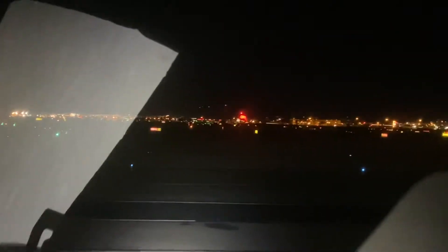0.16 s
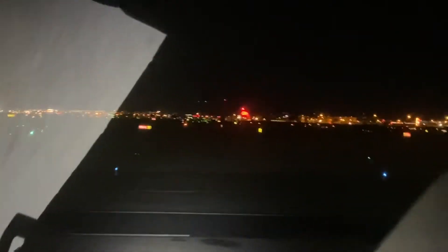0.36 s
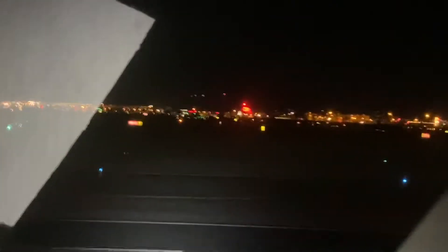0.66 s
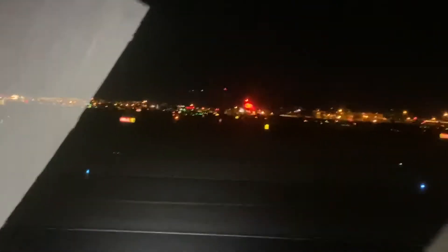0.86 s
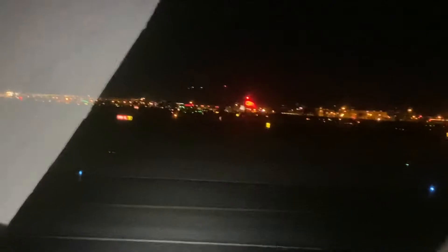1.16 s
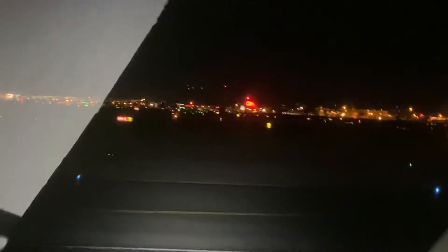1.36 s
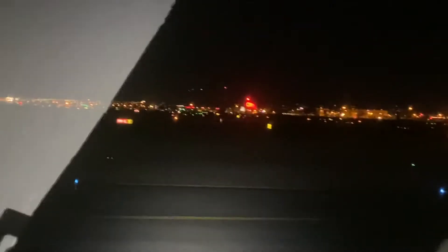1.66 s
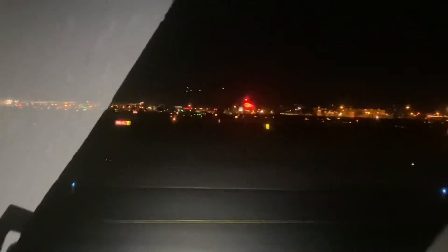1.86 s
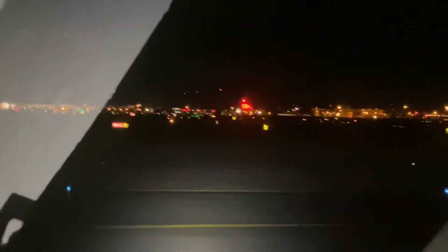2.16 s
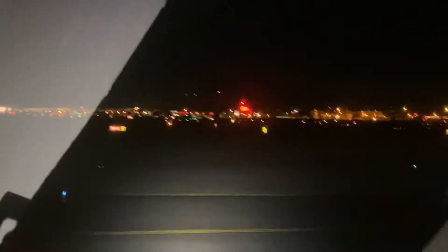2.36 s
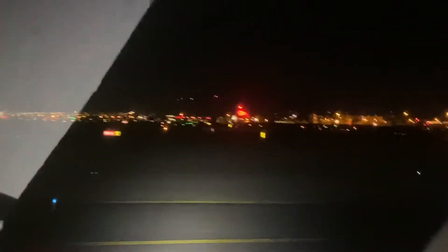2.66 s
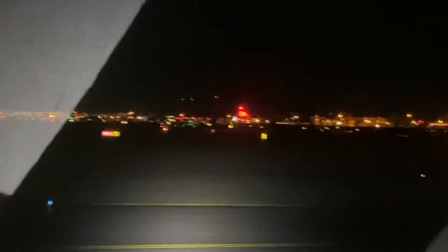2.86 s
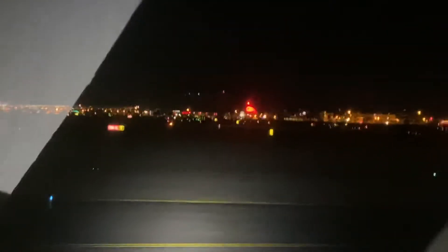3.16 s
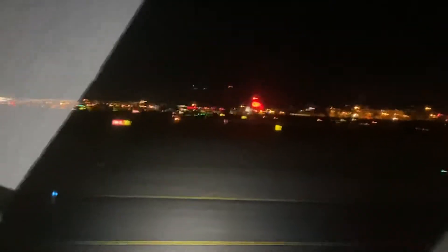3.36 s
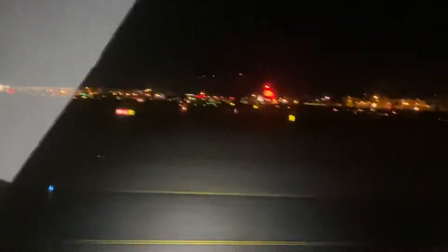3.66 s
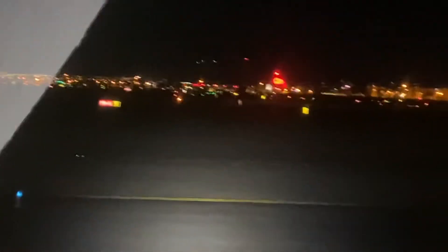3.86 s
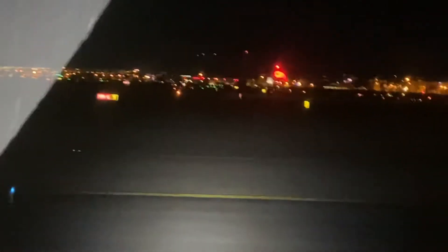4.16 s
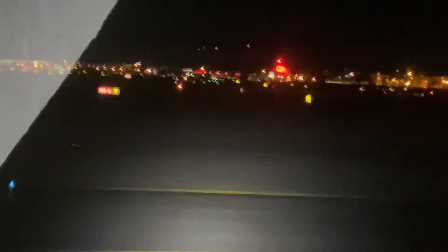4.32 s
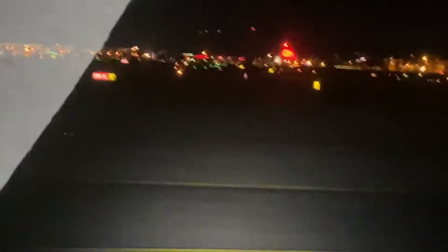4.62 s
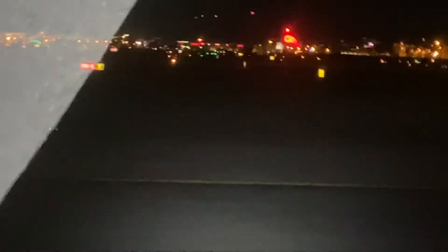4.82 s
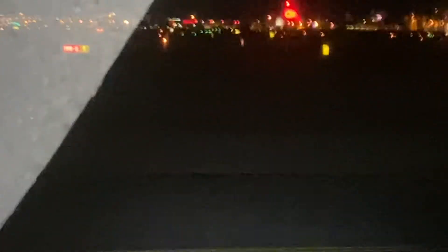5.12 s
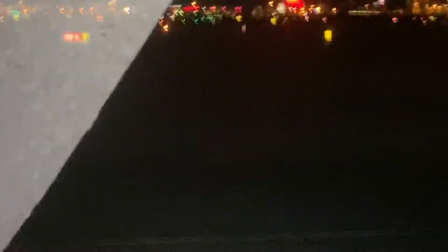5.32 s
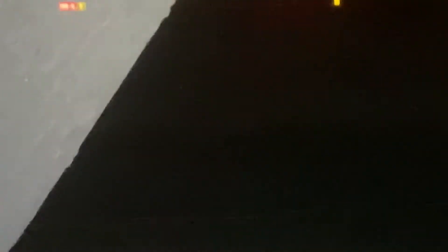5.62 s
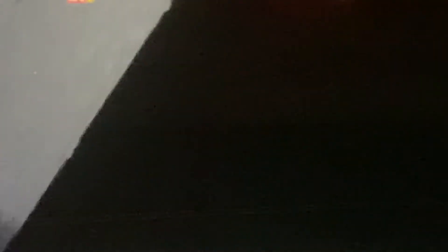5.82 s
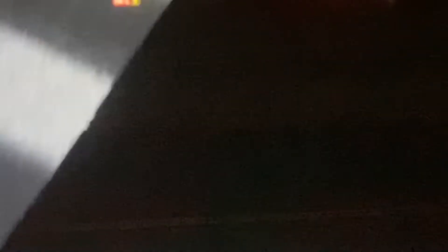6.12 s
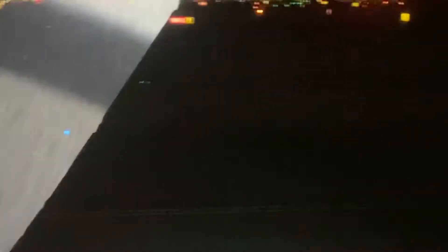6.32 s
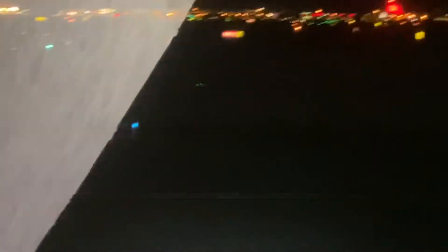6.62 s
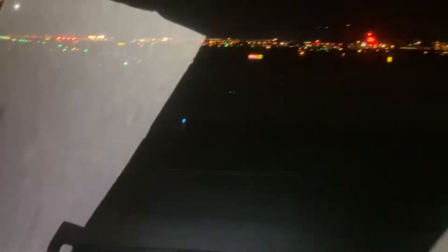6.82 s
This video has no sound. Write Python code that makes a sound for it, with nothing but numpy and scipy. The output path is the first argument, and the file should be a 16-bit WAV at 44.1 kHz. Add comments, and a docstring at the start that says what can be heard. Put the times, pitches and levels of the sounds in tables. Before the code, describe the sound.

A continuous helicopter ride noise heard from within the cabin. Bassy boom and rough midrange chop dominate, fluttering with every blade pass and shifting slightly in strength. Some passes slap harder, early on and again in scattered moments later. Wavering drivetrain hums, a thin steady whine and patchy engine hiss continue throughout, with tiny rattling ticks. The closely spaced microphone pair hears it all inside, without any start-up or shutdown.

```python
"""Inside a helicopter cabin at steady power, heard by two microphone ports a few centimetres apart.
Blade passes throb about twenty times a second: noise that partly repeats from pass to pass, with damped slaps.
Blade hums, a drive shaft and gear teeth are wavering sines, nearly all locked to the rotor angle.
The turbine is patchy hiss with blurred compressor whines, and loose trim ticks as short damped rings."""
import sys
import numpy as np
from scipy import signal
from scipy.fft import rfft, irfft, next_fast_len
from scipy.io import wavfile
from scipy.ndimage import uniform_filter1d, minimum_filter1d, map_coordinates

SR = 44100
rng = np.random.default_rng(int(sys.argv[2]) if len(sys.argv) > 2 else 0)


def master_out(mix):
    """Clip the mix to full scale and print it as 16-bit PCM to the path in sys.argv[1]."""
    frames = np.transpose(np.atleast_2d(mix))
    ceiling = np.clip(frames, -1, 1)
    pcm = np.round(ceiling * 32767).astype(np.int16)
    wavfile.write(sys.argv[1], SR, pcm)


N = 307945  # samples

# Rotor speed: start_s, blade_passes_per_s
BLADE_RATE = [(0.0, 19.986), (0.4, 19.955), (0.8, 19.925), (1.2, 19.982), (1.6, 20.045), (2.0, 20.038),
              (2.4, 19.994), (2.8, 19.955), (3.2, 19.947), (3.6, 19.99), (4.0, 20.023), (4.4, 20.019),
              (4.8, 20.031), (5.2, 20.034), (5.6, 20.044), (6.0, 20.03), (6.4, 19.944), (6.8, 19.89),
              (6.98, 19.893)]


def amp(db):
    """dB to gain."""
    return 10 ** (np.asarray(db) / 20)


def unit(x):
    """Scaled to rms 1."""
    return x / np.sqrt(np.mean(x ** 2) + 1e-20)


def along(points, hz):
    """Values between (Hz, value) points, read on a log frequency axis."""
    f, v = np.transpose(points)
    return np.interp(np.log(hz + 1), np.log(f + 1), v)


def curves(rows):
    """One value per sample for each column after the time."""
    s, *cols = np.transpose(rows)
    return [np.interp(np.arange(N) / SR, s, c) for c in cols]


def wobble(rate):
    """A smooth random curve with `rate` random knots a second."""
    coarse = np.arange(0, N + 32, 32)
    knots = rng.standard_normal(int(N * rate / SR) + 4)
    return np.interp(np.arange(N), coarse, map_coordinates(knots, [coarse * rate / SR]))


def filtered(x, response):
    """x shaped by a complex response of frequency."""
    m = next_fast_len(x.shape[-1] + SR // 2)
    spectrum = rfft(x, m) * response(np.fft.rfftfreq(m, 1 / SR))
    return irfft(spectrum, m)[..., :x.shape[-1]]


def ports(pair):
    """Mixes two unrelated signals into what the left and right port hear of a diffuse cabin sound."""
    # Left-right likeness: pitch_hz, likeness (-1 to 1)
    likeness = [(60, 1), (130, .995), (215, .96), (300, .68), (390, .9), (520, .85), (700, .6), (1100, .3),
                (1500, .1), (1900, .6), (2600, .92), (3600, 1)]
    # Level balance: pitch_hz, left_minus_right_db
    balance = [(40, -.7), (100, -1.5), (200, -3), (300, 0), (400, -2.5), (500, -6), (650, -2.5),
               (900, -1.5), (1300, 0), (16000, 0)]
    # Phase between the ports: pitch_hz, left_lead_rad
    port_lead = [(40, 0), (450, .1), (600, .6), (1000, 1.2), (1300, 0), (6900, 0), (7500, -.5),
                 (8550, -3.14), (9900, -6.28), (10300, -6.28), (11300, -9.1), (12300, -9.5),
                 (13500, -12.56), (14300, -12.56), (15600, -15.7)]

    def spread(hz):
        turn = np.arccos(np.clip(along(likeness, hz), -1, 1)) / 2
        return np.array([np.cos(turn), np.sin(turn)])

    def tilt(hz):
        half = amp(along(balance, hz) / 2) * np.exp(.5j * along(port_lead, hz))
        return np.array([half, 1 / half])

    mid, side = filtered(pair, spread)
    return filtered(np.array([mid + side, mid - side]), tilt)


def passes():
    """Blade passes counted since the start, per sample."""
    return np.cumsum(curves(BLADE_RATE)[0]) / SR


def throb(depth_db, at, second):
    """Gain that swings once per blade pass, with its high at phase `at` when the depth is positive.

    A negative `second` harmonic gives a broad stroke and a short gap."""
    angle = 2 * np.pi * (passes() - at)
    return amp(depth_db * (np.cos(angle) + second * np.cos(2 * angle)))


def echoing_noise(spectrum, lumpy_db):
    """Lumpy noise in which each blade pass partly repeats the last ones: soft lines at the blade rate."""
    # What returns in the next blade pass: pitch_hz, part (0-1)
    memory = [(40, .85), (150, .7), (450, .55), (900, .3)]
    # How much of the repetition survives the turbulence: pitch_hz, part (0-1)
    repeated = [(40, .3), (120, .35), (200, .55), (300, .85), (480, .8), (650, .4), (900, .2)]
    rate = np.mean(np.transpose(BLADE_RATE)[1])

    def comb(hz):
        g, share = along(memory, hz), along(repeated, hz)
        echoes = np.sqrt(1 - g * g) / (1 - g * np.exp(-2j * np.pi * hz / rate))
        return amp(along(spectrum, hz)) * abs(echoes) ** share

    gusts = amp(lumpy_db * wobble(70))
    eddies = np.pad(gusts, SR // 2, "reflect")
    steady = filtered(eddies * rng.standard_normal((2, N + SR)), comb)[:, SR // 2:]
    where = passes() / rate * SR  # read along the rotor angle: the lines follow its speed
    return unit(np.array([map_coordinates(c, [where], order=1) for c in steady]))


def bursts(events, t60, rise, noisy, climb=0):
    """Short damped rings with a noisy pitch, one per event, for two unrelated paths."""
    out, t = np.zeros((2, N + SR)), np.arange(SR // 20) / SR
    shape = amp(-60 * t / t60) * (1 - np.exp(-t / rise))
    for s, db, hz in events:
        shake = unit(uniform_filter1d(rng.standard_normal((2, len(t))), int(SR / hz)))
        pitch = hz * (1 + climb * t + noisy * shake)
        phase = np.cumsum(2 * np.pi * pitch / SR, axis=1)
        out[:, round(s * SR):][:, :len(t)] += amp(db) * shape / shape.max() * np.sin(phase)
    return out[:, :N]


def rotor():
    """Boom, wash, chop and swish throb with the blades, the low ones first; some passes slap."""
    # Cabin drone before its throb: start_s, lower_resonance_db, upper_resonance_db, chop_db
    drone = [(0, -30, -24.5, -29), (.21, -30.5, -23, -26), (.49, -30, -25.5, -23.5), (.7, -21, -19, -31),
             (.9, -26.5, -21, -29), (1.15, -21.5, -25.5, -27.5), (1.55, -29, -22, -28),
             (1.75, -23, -18.5, -27), (1.95, -28, -21, -23), (2.3, -23.5, -24.5, -22),
             (2.76, -27, -22.5, -30), (3.4, -24.5, -24, -25), (4.16, -23, -24, -26),
             (4.78, -30, -22.5, -27), (5.3, -24.5, -24, -23.5), (5.68, -24, -22, -24),
             (6.0, -26.5, -23.5, -27), (6.25, -22, -24, -22), (6.6, -26, -25, -25), (6.98, -28, -30.5, -27)]
    # Throb, before each layer takes its own share: start_s, depth_db
    throb_depth = [(0, -1), (.2, 5), (.55, 3.5), (.8, 2.5), (1.3, 3), (1.7, -1), (2.3, 1.5), (3.4, 1.5),
                   (4.4, 3), (5.15, 2), (5.5, 1.5), (6.2, 1.5), (6.98, 2.5)]
    # Swish before its wander and throb: start_s, level_db
    swish_level = [(0, -28), (.5, -29.5), (.8, -32), (1.3, -32.5), (2.4, -32), (3.5, -33.5), (4.6, -28.5),
                   (5.3, -33), (5.7, -33.5), (6.3, -29.5), (6.98, -35)]
    # Noise colours, all pitch_hz, relative_db per Hz: low cabin pressure,
    boom_colour = [(25, -24), (45, -6.5), (60, -4), (100, -4), (130, -4), (165, -3.5), (200, -7.5),
                   (250, -9), (300, -15.5), (390, -55), (660, -120)]
    # rotor wash in the lower and in the upper cabin resonance,
    low_colour = [(200, -49), (290, -13), (345, 0.5), (385, -6), (440, -35), (700, -120)]
    high_colour = [(280, -51), (370, -9), (425, -1), (480, -3.5), (540, -7.5), (620, -17), (800, -50),
                   (1200, -120)]
    # the brighter chop, and the blade tips late in each pass
    chop_colour = [(300, -64), (450, -19), (540, -2.5), (620, -2), (700, -3), (850, -20), (1000, -23.5),
                   (1200, -32), (1700, -46), (2800, -120)]
    swish_colour = [(550, -52), (680, -4.5), (780, -1.5), (900, -6), (1050, -12.5), (1200, -17),
                    (1400, -18), (2000, -32), (3000, -60), (4000, -120)]
    # Hardest blade slaps on a vortex, before the ports: start_s, peak_db, starting_pitch_hz
    slap_events = [(0.053, -13.5, 454), (0.148, -16, 435), (0.172, -14, 414), (0.203, -17, 465),
                   (0.224, -10.5, 672), (0.249, -9.5, 557), (0.262, -9, 470), (0.274, -11.5, 652),
                   (0.311, -10.5, 506), (0.353, -16.5, 428), (0.364, -9.5, 525), (0.414, -9.5, 515),
                   (0.461, -8.5, 557), (0.468, -12, 715), (0.512, -9, 602), (0.522, -13, 636),
                   (0.567, -20, 540), (0.704, -16, 432), (1.565, -14.5, 688), (1.662, -15.5, 429),
                   (1.84, -6, 428), (2.056, -7.5, 544), (3.519, -11, 475), (3.62, -13, 627),
                   (3.751, -16, 584), (3.803, -12, 626), (3.858, -9.5, 495), (4.058, -11, 609),
                   (4.107, -10.5, 463), (4.255, -15, 460), (4.46, -24, 540), (4.849, -13, 460),
                   (4.903, -9, 575), (5.046, -10, 452), (5.249, -14, 576), (5.52, -15, 600),
                   (5.702, -23, 567), (5.902, -11, 487), (6.206, -11.5, 522), (6.416, -16, 575),
                   (6.92, -19.5, 824)]

    low_db, high_db, chop_db = curves(drone)
    depth_db, = curves(throb_depth)
    swish_db, = curves(swish_level)

    boom = amp(-16 + 1.03 * wobble(3.11)) * echoing_noise(boom_colour, lumpy_db=1)
    boom *= throb(0.6 * depth_db, at=0.14, second=0)
    wash = amp(low_db) * echoing_noise(low_colour, lumpy_db=0.4)
    wash += amp(high_db) * echoing_noise(high_colour, lumpy_db=1.04)
    wash *= throb(1.24 * depth_db, at=0.25, second=-0.11)
    chop = amp(chop_db) * echoing_noise(chop_colour, lumpy_db=1.0)
    chop *= throb(0.85 * depth_db, at=0.31, second=-0.1)
    swish = amp(swish_db + 1.9 * wobble(1.86)) * echoing_noise(swish_colour, lumpy_db=1.5)
    swish *= throb(4.5, at=0.42, second=0.17)
    # climb: a slap rises by this many times its starting pitch per second
    slaps = bursts(slap_events, t60=.06, rise=.002, noisy=.13, climb=17.7)
    return ports(boom + wash + chop + swish + slaps)


def tone(cycles, db, lean_db, lead, flutter_db, drift, rate):
    """An unsteady sine of about rms level db; cycles is its running phase, rate the speed of its wavering.

    lean_db is left minus right, lead the radians by which the left port leads."""
    phase = 2 * np.pi * cycles + drift * wobble(rate) + rng.uniform(0, 2 * np.pi)
    level = np.sqrt(2) * amp(db + flutter_db * wobble(2 * rate))
    left = amp(lean_db / 2) * np.sin(phase + lead / 2)
    right = amp(-lean_db / 2) * np.sin(phase - lead / 2)
    return level * np.array([left, right])


def runout(angle):
    """Uneven gears swell the mesh over each rotor turn: the swing in dB."""
    # Swings: times_per_rotor_turn, depth_db
    swings = [(1, 1.3), (2, 1), (5, 1.4)]
    turns = angle / 3  # three blades
    return sum(db * np.cos(2 * np.pi * k * turns + rng.uniform(0, 2 * np.pi)) for k, db in swings)


def drivetrain():
    """Blade, shaft and gear sines follow the rotor angle; one steady tone ignores rotor speed."""
    # Hums, blade multiples 2, 3, 4, 6, 8, 5: cycles_per_blade_pass
    hum_cycles = [2, 3, 4, 6, 8, 5]
    # Hums that swell and fade: start_s, then level_db of blade multiple 2, 3, 4, 6, 8
    hum_levels = [(0, -18.5, -23, -21, -24, -27), (.6, -18.5, -26, -22.5, -39, -40),
                  (1.1, -41, -17, -21.5, -36, -29), (1.45, -42, -24.5, -29, -24, -34),
                  (1.8, -36, -27, -9, -36, -23.5), (2.1, -24, -26, -27, -32, -30.5),
                  (2.6, -21, -19, -27.5, -16.5, -28), (3.1, -27, -23.5, -39, -27.5, -23.5),
                  (3.6, -23, -26, -20, -32, -36), (3.9, -23, -16.5, -20.5, -22, -25),
                  (4.2, -17, -24, -36, -25, -26), (4.6, -33, -22, -18, -28.5, -24.5),
                  (5.0, -23, -23, -36, -35, -32), (5.5, -29, -29, -29, -24, -24),
                  (5.9, -29, -23, -34, -40, -39), (6.2, -27, -31, -18.5, -26, -39),
                  (6.6, -22, -21, -30, -34, -38), (6.98, -26, -24, -24, -37, -32)]
    # Close pair that beats: start_s, blade_multiple_5_db, shaft_db
    beating = [(0, -26, -20), (.8, -40, -18.5), (1.9, -26, -18.5), (2.8, -21, -19), (3.6, -28, -18),
               (4.0, -20.5, -23), (5.0, -19.5, -19.5), (5.5, -27.5, -17.5), (5.8, -29.5, -18.5),
               (6.2, -22, -18.5), (6.5, -20, -20), (6.98, -23, -18.5)]
    # Tooth-rate multiples 3, 8, 4, 5, 6, 2: cycles_per_blade_pass
    mesh_cycles = [100.2, 267.2, 133.45, 166.8, 200.2, 66.75]
    # The same multiples at the ports: left_minus_right_db, left_lead_rad, flutter_db
    mesh_tones = [(14, -0.15, 1), (0, 0, 2.5), (1, 0.24, 1.6), (-1, .6, 0.4), (0.5, 0, 0.5),
                  (-10.5, -1.44, 2)]
    # Gear whines: start_s, then level_db of tooth multiple 4, 5, 6, shaft_gear_db
    gear_levels = [(0.0, -63, -56, -61, -45), (0.25, -59, -44.5, -60, -41.5), (0.6, -54.5, -42, -66, -38.5),
                   (1.0, -53.5, -45, -60, -40), (1.25, -51, -50.5, -65, -38), (1.5, -55, -50.5, -64.5, -44),
                   (1.8, -61, -54.5, -71, -48), (2.2, -60, -50, -59, -40), (2.6, -55, -47, -60, -39),
                   (2.9, -50, -44.5, -57, -36), (3.2, -51, -44.5, -60, -37), (3.5, -55, -46, -61, -39),
                   (3.8, -55, -44.5, -67, -38), (4.4, -59, -47.5, -64, -37.5), (4.8, -53.5, -53, -71, -38),
                   (5.05, -54, -53, -72, -38.5), (5.25, -64, -61, -61.5, -40), (5.9, -57.5, -58, -64, -40),
                   (6.3, -54.5, -60, -67, -37), (6.7, -59, -55, -55, -35.5), (6.98, -55, -55, -54, -36.5)]
    # Highest whine: start_s, tooth_multiple_8_db
    high_mesh = [(0, -68), (1.2, -63.5), (2.3, -70), (3.2, -62), (3.9, -65), (4.5, -63), (5.4, -61.5),
                 (6.3, -61), (6.98, -69)]
    # Lower whines: start_s, tooth_multiple_2_db, steady_tone_db
    low_whines = [(0, -47, -46.5), (1.0, -45.5, -47.5), (1.7, -47, -45.5), (2.15, -43.5, -45.5),
                  (2.5, -44, -46), (3.1, -42.5, -46), (4.1, -42, -46), (4.4, -47, -47.5),
                  (4.95, -40, -43.5), (5.6, -50, -46), (6.0, -45, -44.5), (6.5, -41, -44),
                  (6.98, -46, -46.5)]
    # Weak gear tones: cycles_per_blade_pass, mean_level_db
    faint_tones = [(147.1, -71), (157.9, -73), (176.4, -72), (233.8, -72), (265.53, -74), (299.5, -75),
                   (312.2, -78)]
    # Shaft gear: cycles_per_blade_pass, left_minus_right_db, left_lead_rad
    shaft_gear = (88.2, 1.4, -1.4)
    # Steady tone: pitch_hz, left_minus_right_db, left_lead_rad
    steady_tone = (1471.3, 11.8, .3)

    angle = passes()
    fifth_db, shaft_db = curves(beating)
    hum_db = curves(hum_levels) + [fifth_db]
    hum = sum(tone(k * angle, db, -1.3, 0, flutter_db=0.6, drift=0.5, rate=2.97)
              for k, db in zip(hum_cycles, hum_db))
    shaft_turns = shaft_gear[0] / 17 * angle  # one turn per 17 teeth of its gear
    shaft = tone(shaft_turns, shaft_db, -1.1, 0, flutter_db=.4, drift=.12, rate=1.5)

    *swelling_db, gear_db = curves(gear_levels)
    second_db, steady_db = curves(low_whines)
    third_db = -57.5 + 0.5 * wobble(4)
    mesh_db = [third_db] + curves(high_mesh) + swelling_db + [second_db]
    mesh = sum(tone(k * angle, db + runout(angle), lean_db, lead, flutter_db, drift=0.57, rate=18)
               for k, db, (lean_db, lead, flutter_db) in zip(mesh_cycles, mesh_db, mesh_tones))
    faint = sum(tone(k * angle, db + 3.6 * wobble(1.5), 0, 0, flutter_db=3.5, drift=0.69, rate=15)
                for k, db in faint_tones)
    gear = tone(shaft_gear[0] * angle, gear_db, *shaft_gear[1:], flutter_db=1.47, drift=0.33, rate=12)
    steady_cycles = steady_tone[0] * np.arange(N) / SR
    steady = tone(steady_cycles, steady_db, *steady_tone[1:], flutter_db=1.3, drift=0.27, rate=12)
    return hum + shaft + mesh + faint + gear + steady


def narrow(hz, width_hz):
    """Two noises of about rms 1 in a narrow band around a centre that may move."""
    blur = unit(filtered(rng.standard_normal((2, N)), lambda f: 1 / (1 + (f / width_hz) ** 2)))
    return np.sqrt(2) * blur * np.sin(2 * np.pi * np.cumsum(hz + np.zeros(N)) / SR)


def turbine():
    """Broad hiss, patchy and faintly pulsed by the blades, and blurred compressor whines."""
    # Engine hiss colour: pitch_hz, relative_db per Hz
    hiss_colour = [(500, -17), (900, -4.5), (1300, -6), (1800, -9.5), (2200, -16.5), (3000, -21.5),
                   (4300, -28), (6000, -29.5), (8000, -30.5), (9000, -29), (9800, -31.5), (10700, -31),
                   (11300, -38.5), (13000, -39.5), (15000, -32), (16000, -26)]
    # Lift of the hiss around 2600 Hz: start_s, lift_db
    roar = [(0, 4), (.5, 0), (1.2, 0.5), (2, 1.3), (3, -0.5), (4.5, 0.5), (5.4, -0.5), (6.98, -0.5)]
    # Compressor whine, following its speed: start_s, pitch_hz
    whine_pitch = [(0.0, 10400), (0.4, 10820), (1.0, 10800), (1.5, 10780), (2.1, 10730), (2.8, 10750),
                   (3.6, 10870), (4.1, 10740), (4.8, 10770), (6.0, 10600), (6.6, 10700), (6.98, 10740)]
    # A lower whistle that comes and goes: start_s, level_db
    whistle_level = [(0, -58), (.9, -58), (1.25, -76), (1.9, -59), (2.8, -59), (3.9, -73), (4.8, -73),
                     (5.3, -59), (6.98, -57)]

    f, s, z = signal.stft(rng.standard_normal((2, N)), SR, nperseg=512)
    roar_band = np.exp(-((f - 2600) / 890) ** 2)  # Hz
    roar_db = np.outer(roar_band, np.interp(s, *np.transpose(roar)))
    patches = uniform_filter1d(rng.standard_normal(z.shape[1:]), 8, 0)  # across frequency
    patches = unit(uniform_filter1d(patches, 5, 1))  # along time
    patchy = signal.istft(z * amp(1.53 * patches + roar_db), nperseg=512)[1][:, :N]
    hiss = unit(filtered(patchy, lambda hz: amp(along(hiss_colour, hz))))
    hiss *= amp(-35.5 + 0.14 * wobble(1.6))
    hiss *= throb(.45 + .25 * wobble(2), at=.42, second=.3)

    whine_hz, = curves(whine_pitch)
    whistle_db, = curves(whistle_level)
    whine = amp(-61) * narrow(whine_hz, width_hz=110)
    whistle = amp(whistle_db) * narrow(9040 + 40 * wobble(1.8), width_hz=150)
    return ports(hiss + whine + whistle)


def some_passes(share, at, db, hz):
    """Rows of start_s, peak_db, pitch_hz scattered around the given values, for a random share of passes."""
    angle = passes()
    turn = np.arange(int(angle[-1]))
    draw = rng.standard_normal((len(turn), 3))
    chosen = rng.uniform(size=len(turn)) < share
    s = np.interp(turn + at + .05 * draw[:, 0], angle, np.arange(N) / SR)
    rows = np.transpose([s, db + 2 * draw[:, 1], hz * (1 + .12 * draw[:, 2])])
    return list(rows[chosen])


def rattle():
    """Loose trim ticks as damped rings: listed loud ones, and weak ones in a random share of blade passes."""
    # Loudest ticks, before the trim and ports below: start_s, peak_db, pitch_hz
    loud_ticks = [(0.2209, -43, 4270), (0.2718, -40, 6070), (0.5691, -40, 5500), (0.621, -40, 4460),
                  (0.9183, -43, 5300), (1.0156, -42, 5360), (4.6154, -38, 5350), (4.9172, -41, 6800),
                  (4.9651, -42, 6160), (5.3632, -40.5, 5400), (6.14, -43, 7000), (6.265, -43, 6470),
                  (6.4108, -42, 5700), (6.5625, -43, 4660)]
    # Weak ticks, likewise: share of passes (0-1), place in the pass (0-1), mean_peak_db, mean_pitch_hz
    weak_ticks = (.12, .36, -45.5, 4900)
    ticks = bursts(loud_ticks + some_passes(*weak_ticks), t60=.04, rise=.002, noisy=.07)
    return amp(-5) * ports(ticks)


def scene():
    """Everything heard in the cabin."""
    return rotor() + drivetrain() + turbine() + rattle()


def record(dry):
    """The microphone drops the deepest bass; a limiter holds the loudest peaks; then the band limit."""
    dry = filtered(dry, lambda hz: 1 / (1 + (29 / (hz + 1)) ** 4))
    needed = np.minimum(1, .92 / (abs(dry).max(axis=0) + 1e-9))
    gain = uniform_filter1d(minimum_filter1d(needed, size=801), size=400)
    from_edge = np.minimum(np.arange(N), np.arange(N)[::-1])
    gain *= np.clip(from_edge / 130, 0, 1)  # a soft start and stop
    return filtered(dry * gain, lambda hz: hz < 15750)


dry = scene()
out = record(dry)
master_out(out)
```